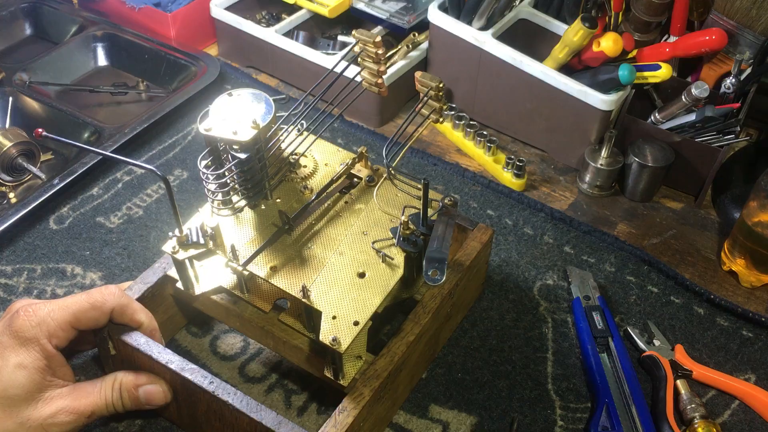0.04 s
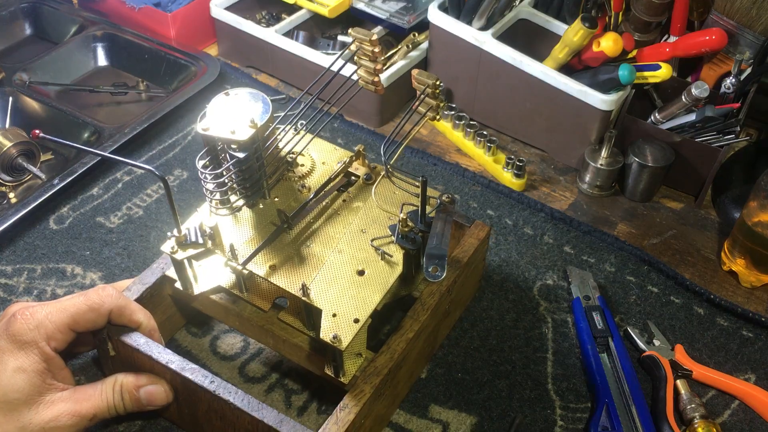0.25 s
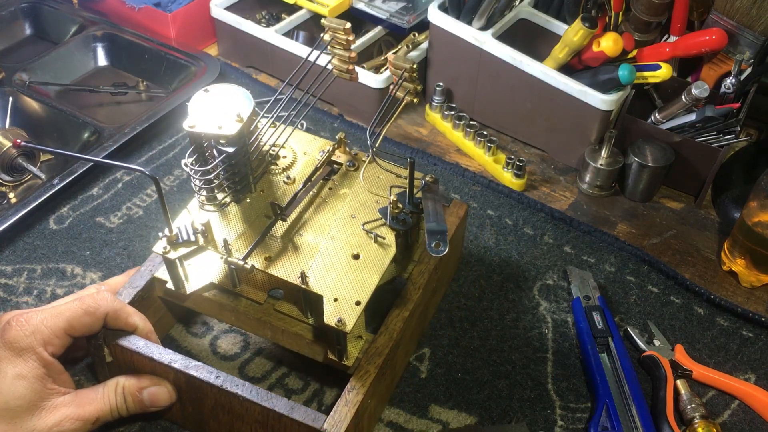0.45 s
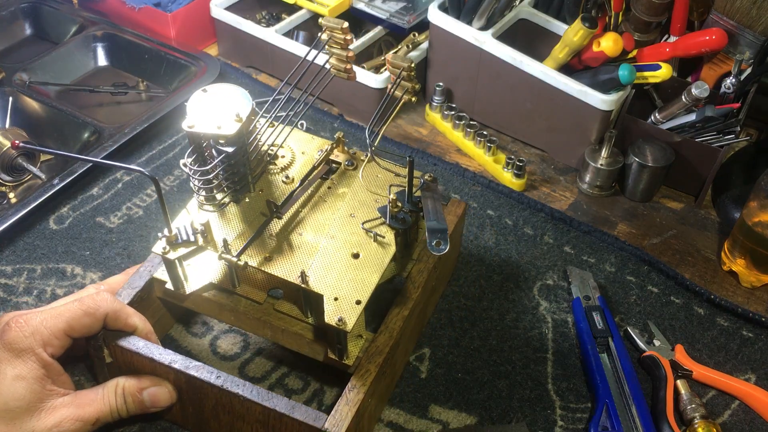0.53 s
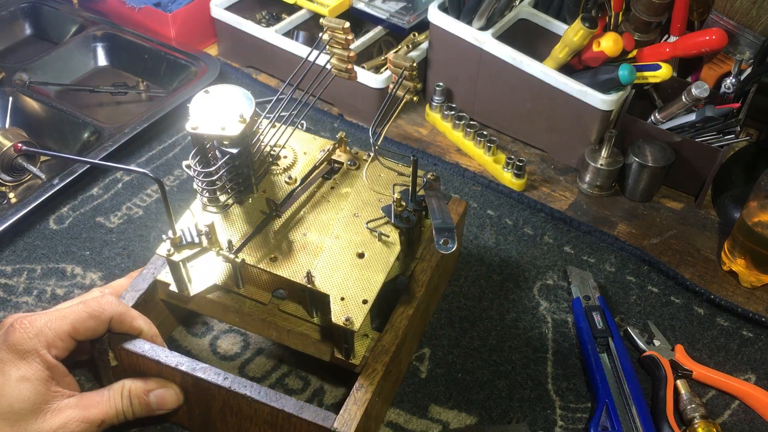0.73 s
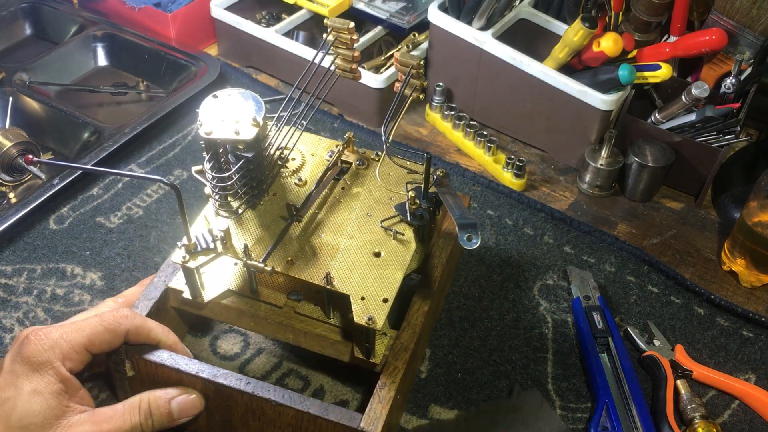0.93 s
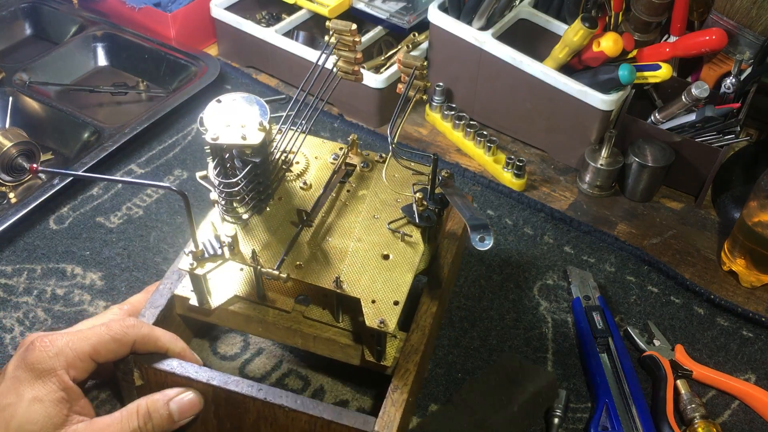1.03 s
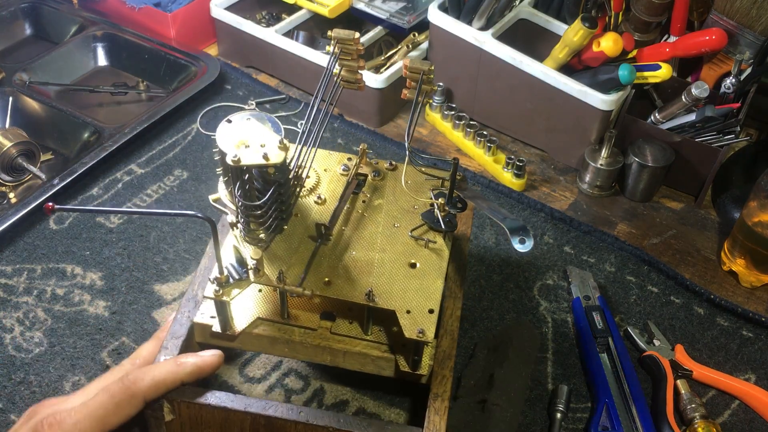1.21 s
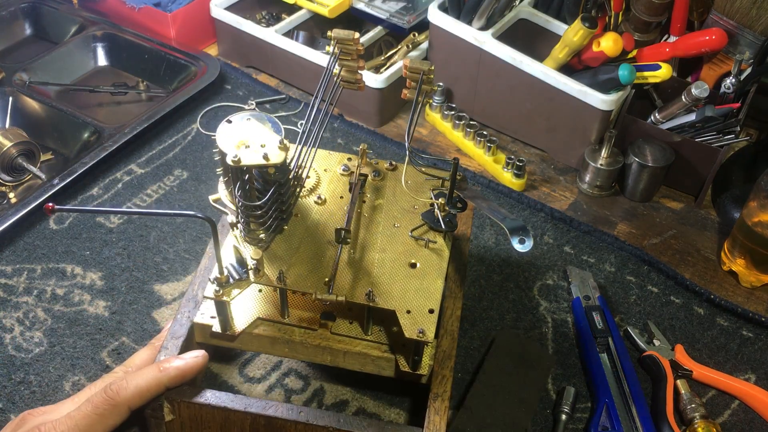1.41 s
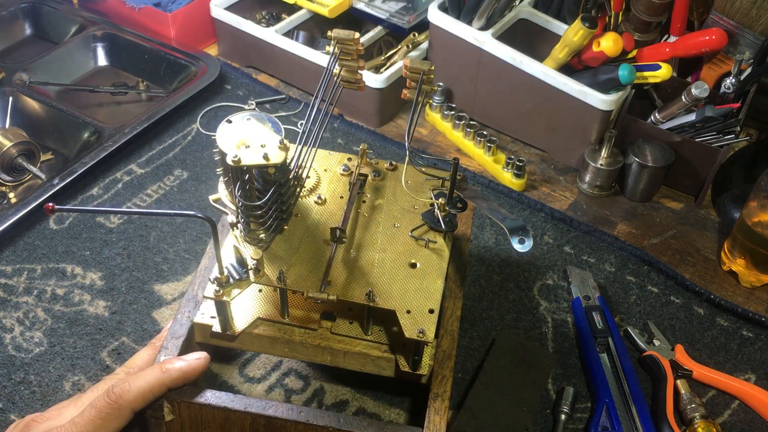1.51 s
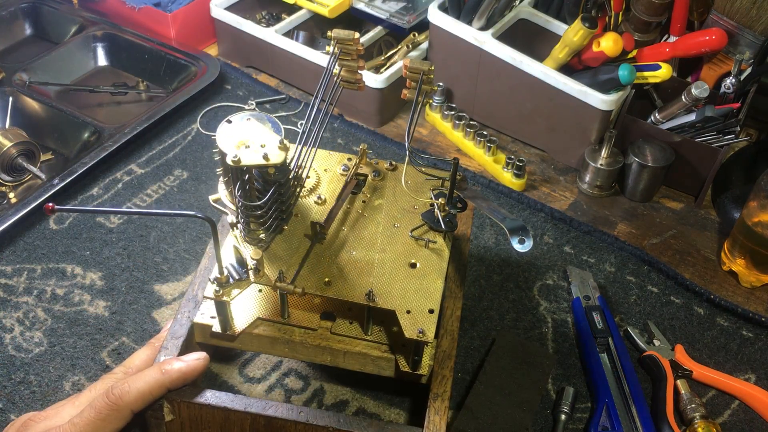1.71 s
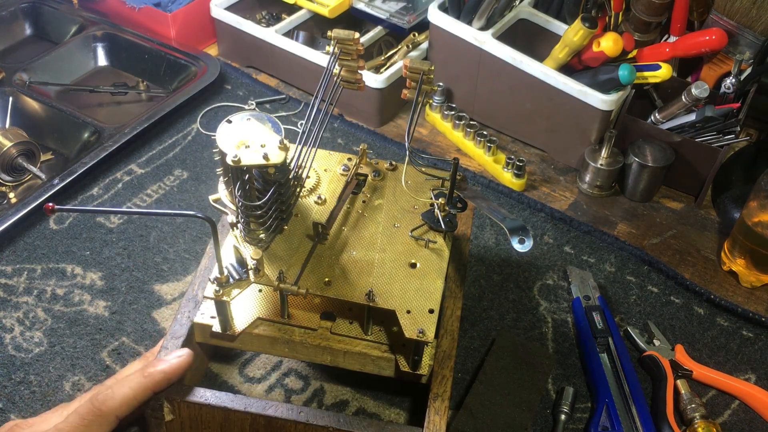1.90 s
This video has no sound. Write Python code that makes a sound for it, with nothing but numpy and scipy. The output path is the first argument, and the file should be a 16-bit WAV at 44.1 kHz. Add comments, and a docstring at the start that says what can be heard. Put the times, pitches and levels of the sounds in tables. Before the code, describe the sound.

Sharp metal clicks and light rattles from a clock mechanism being handled on a workbench.

```python
"""A small workshop, close to the bench: a brass clock movement on a wooden stand is handled and turned.
Its levers tick and rattle against the plates, one snaps home hard, and the stand thumps softly.
The stand hisses over the bench mat as it turns and a hammer wire is touched; thin squeaks follow
and a small catch drops. Low room rumble and mains hum lie behind."""
import sys
import numpy as np
from scipy import signal
from scipy.fft import rfft, irfft
from scipy.io import wavfile
from scipy.ndimage import uniform_filter1d

SR = 44100
rng = np.random.default_rng(int(sys.argv[2]) if len(sys.argv) > 2 else 0)


def persist_wave(psi):
    """Save psi, clipped to +-1, as 16-bit WAV."""
    counts = np.round(np.clip(psi, -1, 1) * 32767).astype(np.int16)
    wavfile.write(sys.argv[1], SR, np.atleast_2d(counts).T)


N = 85995

# the lever snapping home, first just before the start so only its tail sounds: start_s, level_db
SNAP_HITS = [(-.03, -6), (0.3277, 2.5)]
# modes of the lever: pitch_hz, level_db, t60_s
LEVER_MODES = [(3484, -34.5, .035), (5530, -51, .04), (5670, -33.5, .045), (5875, -20, .036),
               (6310, -21, 0.034), (6870, -44.5, 0.044), (7090, -29, .045), (7330, -39.5, .045),
               (9020, -25.5, .036), (9280, -30.5, 0.022), (9510, -23.5, .034), (10392, -36.5, 0.019),
               (13597, -25.5, .022), (14200, -43, .034)]
# tone of the lever's long ring: freq_hz, gain_db
LEVER_RING_EQ = [(5500, -4.5), (6200, -1.5), (9000, 0), (9650, 1.5), (11000, -9), (14000, -19)]
# tone of the snap's attack: freq_hz, gain_db
CRACK_EQ = [(300, -11), (750, -15), (1100, -4), (1900, -8), (2800, -15), (3650, -9), (4400, -12),
            (5200, -6), (6100, 3.5), (7900, -9.5), (9300, 1.5), (11500, -7.5), (13700, -0.5),
            (16000, -11.5)]
# room tone: freq_hz, gain_db
AIR_EQ = [(25, -25), (42, -2), (80, -4), (149, -4.5), (199, -15), (315, -15.5), (373, -18.5), (475, -20),
          (1750, -29), (2700, -28), (5000, -38), (8000, -52.5), (16000, -54.5)]
# hum tones: pitch_hz, level_db
HUM_TONES = [(59.5, -59), (119, -65.5), (247.6, -70), (301.5, -69)]
# swell of the stand sliding on the mat: time_s, level_db
SLIDE_LEVELS = [(0, -50.5), (.1, -59.5), (.3, -60), (.5, -54.5), (.62, -62.5), (.76, -69.5), (.81, -60.5),
                (.95, -60), (1.12, -56.5), (1.29, -53.5), (1.36, -68), (1.45, -70)]
# tone of the slide: freq_hz, gain_db
SLIDE_EQ = [(290, -48.5), (500, -18.5), (729, 0), (795, 2), (1900, -4.5), (2190, -2), (2390, -2),
            (9360, -8), (16000, -21.5)]
# light metal contacts: start_s, low_db, mid_db, high_db, top_db, chatter_db, ring_db
TICK_HITS = [(.1230, -37.5, -41.5, -37.5, -49.5, 5.5, -3.5), (.1762, -50.5, -45.5, -43, -49, 0.5, -0.5),
             (.2367, -44, -51, -54, -49, -15, 6.5), (.2378, -36, -42, -31, -44, -9, -2.5),
             (.2435, -41.5, -31.5, -36, -35.5, 5.5, -1), (.2498, -32, -61, -56, -61, 2, -2.5),
             (.3114, -34.5, -49, -73, -70, 6, -12), (.3473, -45.5, -41, -51, -59, 0, 2),
             (.4180, -53.5, -47, -41, -45, -1, 2), (.4350, -39.5, -64, -45, -46, 6, -32),
             (.4403, -38, -37.5, -39, -42, 6.5, -14), (.4428, -44, -27.5, -44, -60, -8, -7),
             (.9525, -47, -72, -64, -67, 1, -28), (.9738, -26, -31, -25, -48, -5, -41),
             (.9765, -35, -41, -39.5, -57, 3.5, -5.5), (1.0135, -36.5, -45, -43, -55.5, 4.5, -1.5),
             (1.0305, -29, -44, -63, -66, 4.5, -3), (1.0395, -39, -37, -46.5, -68, -8, -0.5),
             (1.0450, -39, -44, -63, -68, 3, -10), (1.7228, -62.5, -41, -52, -58, 2, -25),
             (1.7535, -64, -55, -48, -57, -6, -18), (1.7675, -60, -60.5, -68, -80, -4, -12),
             (1.7768, -52, -53, -63, -74, -5, -8), (1.872, -70, -75, -80.5, -87, -6, 9.5)]
# modes of the plates and rods: pitch_hz, level_db, t60_s
FRAME_MODES = [(1453, -8.5, 0.062), (1663, -2, 0.035), (2865, 1, 0.047), (3035, -6, .08), (3240, -7, 0.071),
               (4602, 0, 0.051), (4780, -3.5, 0.02), (6490, 3, 0.0263), (6720, -3.5, .025),
               (12150, 2.5, .04)]
# the stand bumping on the bench: start_s, level_db
THUMP_HITS = [(0.23, -34.5), (.2520, -42), (0.3116, -44), (0.3287, -26.5), (0.3334, -28.5), (.4440, -38),
              (0.986, -51), (1.032, -52)]
# modes of the wooden stand: pitch_hz, level_db, t60_s
STAND_MODES = [(86, -18, .42), (132, -15, .24), (196.3, -2, .05), (265.5, -3.5, 0.033), (350, -4, 0.017)]
# modes of the hammer wire: pitch_hz, level_db, t60_s
WIRE_MODES = [(1616, 0.5, 0.02), (2830, -18, .045)]
# one glide for each squeak: time_s, pitch_hz, level_db
SQUEAK_GLIDES = [
    [(1.37, 8900, -88), (1.41, 10800, -78), (1.44, 11700, -72.5), (1.465, 11400, -73), (1.5, 12600, -73),
     (1.55, 13800, -80)],
    [(1.47, 9500, -84), (1.53, 10500, -77), (1.57, 10300, -75), (1.615, 11300, -69.5),
     (1.645, 11400, -65.5), (1.68, 11490, -67), (1.71, 10800, -72), (1.75, 11100, -70.5),
     (1.81, 9200, -83.5)],
    [(1.59, 14300, -79), (1.63, 12500, -73), (1.67, 15100, -80.5), (1.7, 13200, -77), (1.76, 13150, -69),
     (1.8, 11000, -83.5)],
    [(1.5, 8900, -85), (1.56, 9170, -78), (1.63, 9400, -78), (1.67, 9700, -80), (1.73, 9100, -83)],
]
# modes of the catch: pitch_hz, level_db, t60_s
CATCH_MODES = [(2800, -15, 0.022), (4440, -3.5, 0.017), (4800, -7, .018), (5090, -1.5, .018),
               (6250, 2.5, 0.022), (6470, -2.5, 0.02)]
# body of the reverb: freq_hz, gain_db
REVERB_BODY_EQ = [(100, 2.5), (500, 5.5), (4000, -4.5), (9000, -15)]
# sheen of the reverb: freq_hz, gain_db
REVERB_TREBLE_EQ = [(3000, -28), (6200, 4), (9500, 3.5), (12000, -1), (15000, -3.5)]


def undb(db):
    """Decibels to gain."""
    return 10 ** (np.asarray(db) / 20)


def unit(x):
    """Scale to rms 1."""
    return x / np.sqrt(np.mean(x ** 2))


def fade(t60):
    """Exponential decay that loses 60 dB in t60 seconds."""
    return np.exp(-np.log(1000) * np.arange(N) / SR / t60)


def place(x, start_s):
    """Cue a sound at start_s; anything before zero is cut."""
    i = int(round(start_s * SR))
    return np.pad(x, (max(i, 0), max(-i, 0)))[max(-i, 0):][:N]


def gain_at(hz, eq):
    """Gain of an EQ curve on a log-frequency axis."""
    freqs, db = np.array(eq, float).T
    return undb(np.interp(np.log(np.maximum(hz, 1)), np.log(freqs), db))


def equalise(x, eq, size=512):
    """Minimum-phase EQ, which keeps attacks sharp."""
    cepstrum = irfft(np.log(gain_at(np.fft.rfftfreq(size, 1 / SR), eq)))
    cepstrum[1:size // 2] *= 2
    cepstrum[size // 2 + 1:] = 0
    return signal.fftconvolve(x, irfft(np.exp(rfft(cepstrum))))[:len(x)]


def noise(eq):
    """Steady noise shaped by an EQ curve, rms 1."""
    return unit(irfft(rfft(rng.standard_normal(N)) * gain_at(np.fft.rfftfreq(N, 1 / SR), eq), N))


def ring(hz, t60):
    """One struck mode."""
    return np.sin(2 * np.pi * hz * np.arange(N) / SR) * fade(t60)


def crack(eq, chatter_db, t60_s, chatter_s, size=4096):
    """A hard contact: a spike, a sharp burst, then a brief dense chatter of small parts."""
    t = np.arange(size) / SR
    spike = undb(3.5) * np.exp(-t / .0003)
    chatter = undb(chatter_db) * np.exp(-(t / chatter_s) ** 2)
    burst = rng.choice([-1., 1.], size) * np.hypot(fade(t60_s)[:size] + spike, chatter)
    return np.pad(equalise(burst, eq), (0, N - size))


def lever_snap(ring_db=-38.5, t60_cycles=6000):
    """A sprung lever strikes its stop: a crack, bright modes and a faint long ring."""
    modes = 0
    for k, (hz, db, t60) in enumerate(LEVER_MODES):
        long_ring = undb(ring_db) * gain_at(hz, LEVER_RING_EQ) * ring(hz, t60_cycles / hz)
        modes += (-1) ** k * undb(db) * (ring(hz, t60) + long_ring)
    return modes + undb(-13) * crack(CRACK_EQ, chatter_db=-8.5, t60_s=.002, chatter_s=.012)


def room_tone(t):
    """The workshop's bed: low rumble, faint hiss and mains hum."""
    air = undb(-54.5) * noise(AIR_EQ)
    hum = sum(undb(db) * np.sin(2 * np.pi * (hz * t + rng.random())) for hz, db in HUM_TONES)
    return air + np.sqrt(2) * hum


def stand_slide(t, grain_db=1):
    """Wood rubs over the mat: a slightly grainy hiss."""
    grain = unit(uniform_filter1d(rng.standard_normal(N), 180))
    level_db = np.interp(t, *np.array(SLIDE_LEVELS).T) + grain_db * grain
    return noise([(150, -47), *SLIDE_EQ]) * undb(level_db)


def frame_ticks(spread_db=4.5):
    """Levers and wires tap the frame; each point of contact favours different modes."""
    modes = [(-1) ** k * undb(db) * ring(hz, t60) for k, (hz, db, t60) in enumerate(FRAME_MODES)]
    out = 0
    for start_s, low, mid, high, top, chatter_db, ring_db in TICK_HITS:
        eq = [(500, low - 20), (1000, low - 9), (1450, low - 1), (2900, low),
              (4500, mid), (6600, high), (8800, high), (13000, top)]
        weights = undb(spread_db * rng.uniform(-1.07, 1, len(modes)))
        body = sum(weight * gain_at(hz, eq) * mode
                   for (hz, _, _), weight, mode in zip(FRAME_MODES, weights, modes))
        attack = undb(2) * crack(eq, chatter_db, t60_s=.0032, chatter_s=.0053)
        out += place(attack + undb(ring_db - 2) * body, start_s)
    return out


def knocks(modes, hits, contact_s):
    """Blows on one object; its ring builds while the contact lasts."""
    body = sum(undb(db) * ring(hz, t60) for hz, db, t60 in modes)
    attack = 1 - np.exp(-(np.arange(N) / SR / contact_s) ** 2)
    return sum(undb(db) * place(body * attack, start_s) for start_s, db in hits)


def stand_thumps():
    """The wooden stand bumps the bench, soft and low."""
    return knocks(STAND_MODES, THUMP_HITS, contact_s=.00085)


def wire_touch(start_s=1.0932, level_db=-31.5):
    """A hammer wire, softly touched, gives a short ping."""
    return knocks(WIRE_MODES, [(start_s, level_db)], contact_s=.00039)


def squeaks(t, edge_s=.02, waver_hz=130, halo_hz=1300):
    """Faint high whistles glide about, each a wavering line in a halo of hiss."""
    out = 0
    for glide in SQUEAK_GLIDES:
        times, hz, db = np.array(glide).T
        waver, halo = (noise([(width, 0), (4 * width, -40)]) for width in (waver_hz, halo_hz))
        gate = np.clip(np.minimum(t - times[0], times[-1] - t) / edge_s + 1, 0, 1)
        whistle = np.sqrt(2) * np.sin(2 * np.pi * np.cumsum(np.interp(t, times, hz)) / SR)
        roughness = 1 + .45 * waver + undb(-1) * halo
        out += whistle * roughness * gate * undb(np.interp(t, times, db))
    return out


def catch_drop(start_s=1.7228, level_db=-41):
    """A small catch drops with a bright click."""
    return knocks(CATCH_MODES, [(start_s, level_db)], contact_s=.0001)


def reverb(x, wet_db=-17, body_t60_s=.81, treble_t60_s=.63, predelay_s=.016):
    """Add the workshop's reverb, whose treble dies sooner."""
    body = noise(REVERB_BODY_EQ) * fade(body_t60_s)
    treble = undb(-2) * noise(REVERB_TREBLE_EQ) * fade(treble_t60_s)
    tail = body + treble
    tail = place(tail / np.linalg.norm(tail), predelay_s)
    return x + undb(wet_db) * signal.fftconvolve(x, tail)[:N]


def scene():
    """Mono mix: clicks and thumps with reverb, over dry slide, squeaks and room tone."""
    t = np.arange(N) / SR
    snap = reverb(lever_snap())
    snaps = sum(undb(db) * place(snap, start_s) for start_s, db in SNAP_HITS)
    handling = reverb(frame_ticks() + stand_thumps() + wire_touch() + catch_drop())
    return (snaps + handling + stand_slide(t) + squeaks(t) + room_tone(t))[None]


def record(dry, low_cut_hz=36, high_cut_hz=16300):
    """Trim the deepest bass and the very top."""
    thinned = signal.sosfilt(signal.butter(4, low_cut_hz, "high", fs=SR, output="sos"), dry)
    return signal.sosfilt(signal.ellip(10, .2, 80, high_cut_hz, fs=SR, output="sos"), thinned)


dry = scene()
out = record(dry)
persist_wave(out)
```